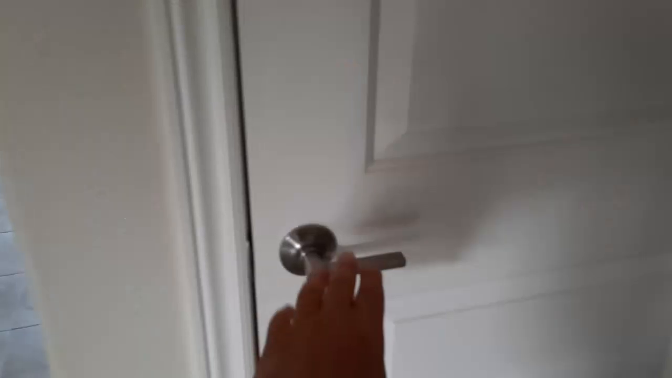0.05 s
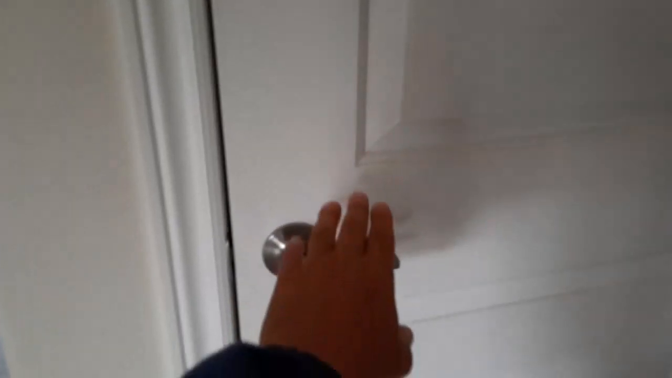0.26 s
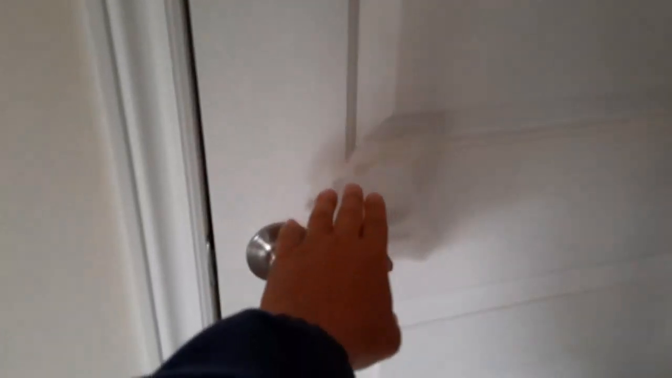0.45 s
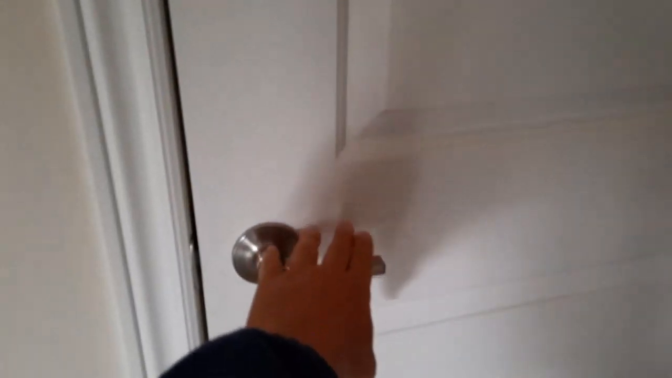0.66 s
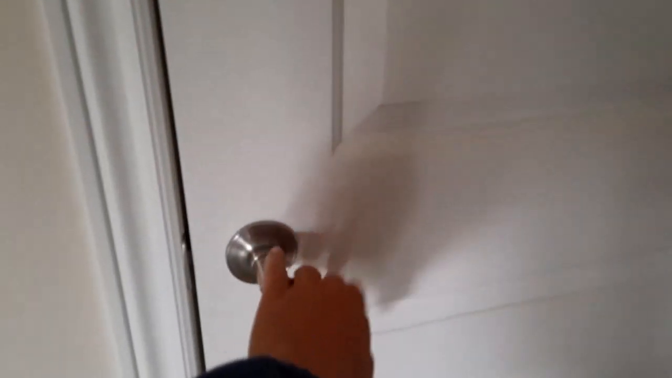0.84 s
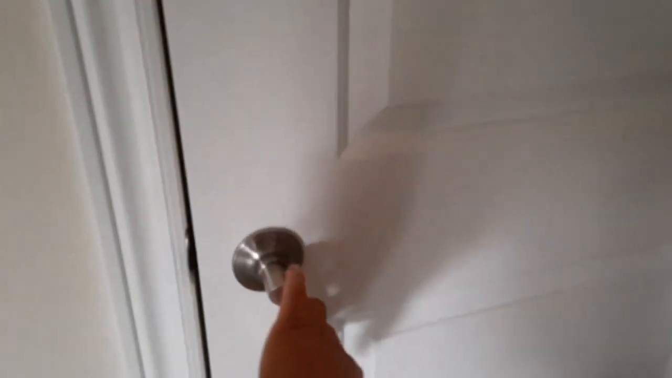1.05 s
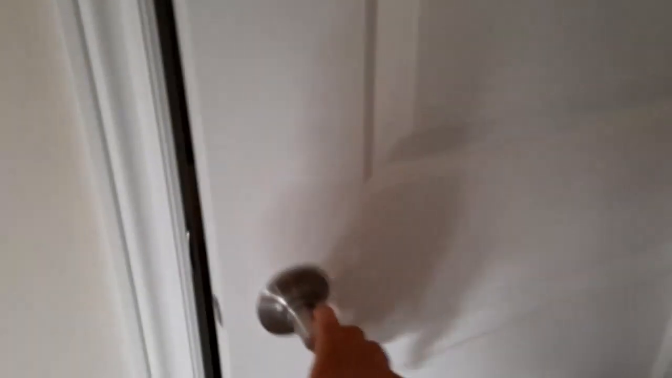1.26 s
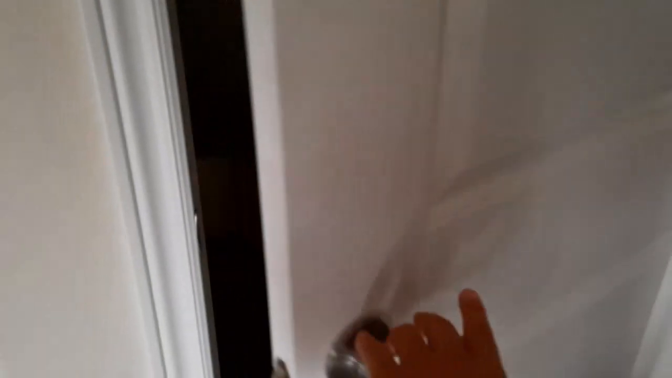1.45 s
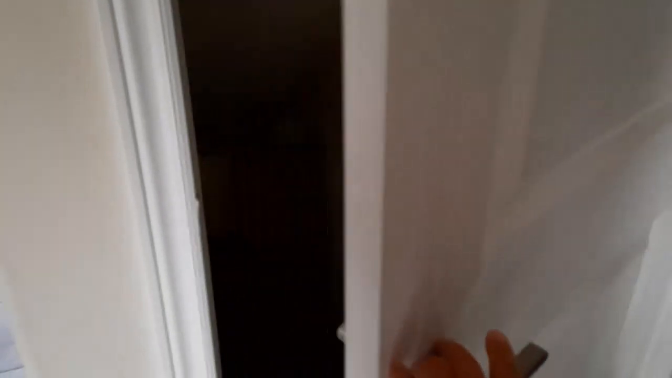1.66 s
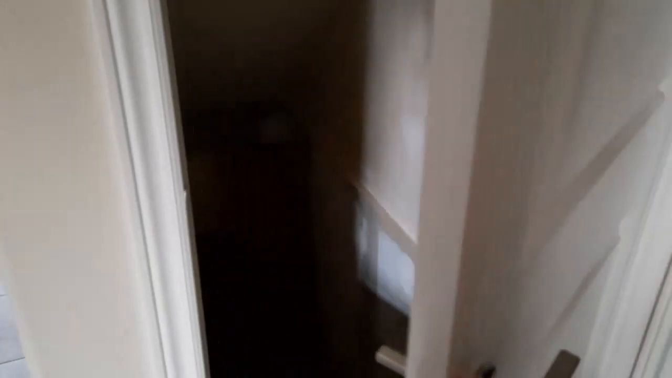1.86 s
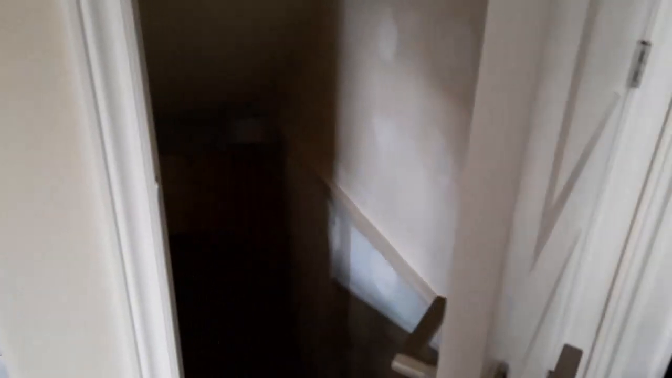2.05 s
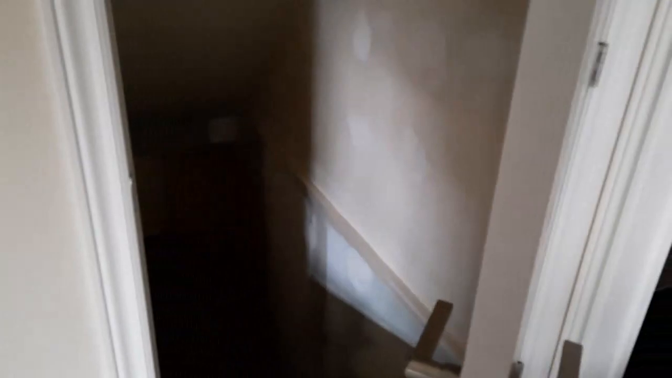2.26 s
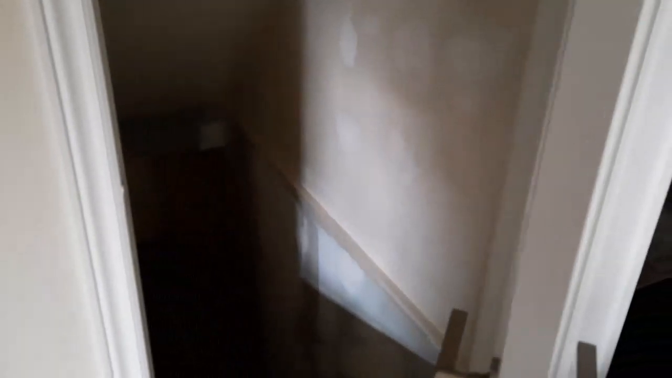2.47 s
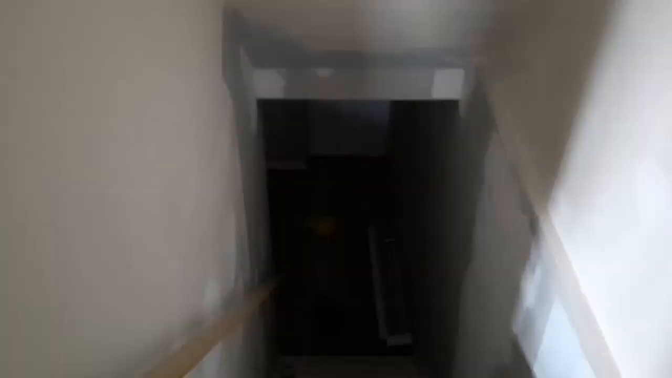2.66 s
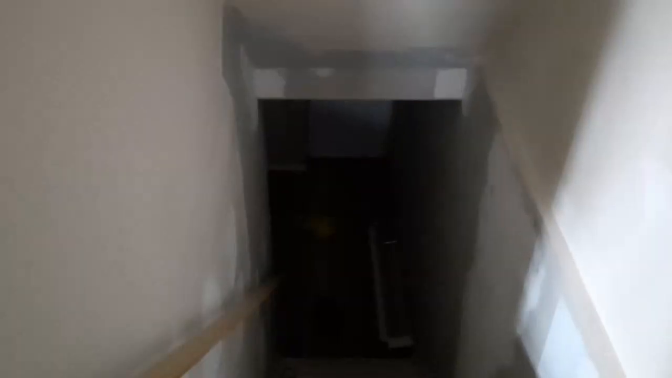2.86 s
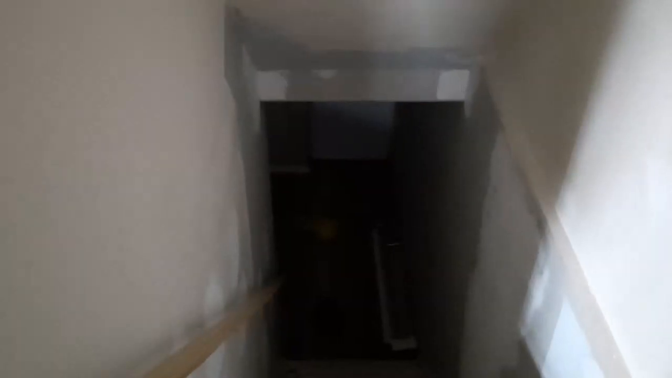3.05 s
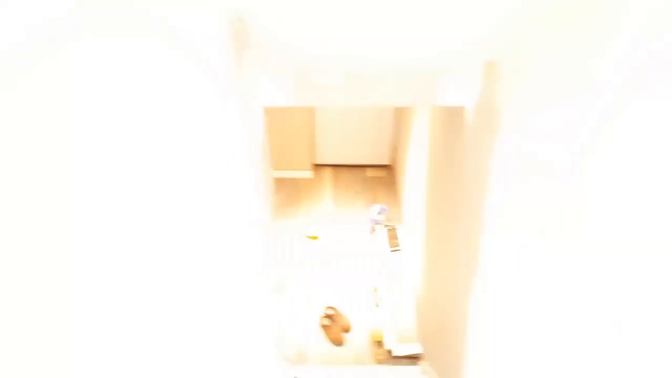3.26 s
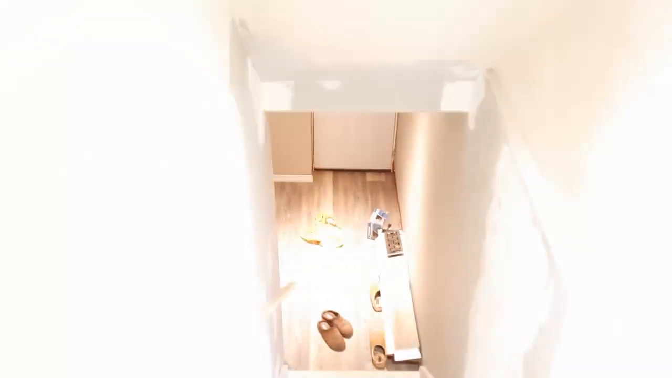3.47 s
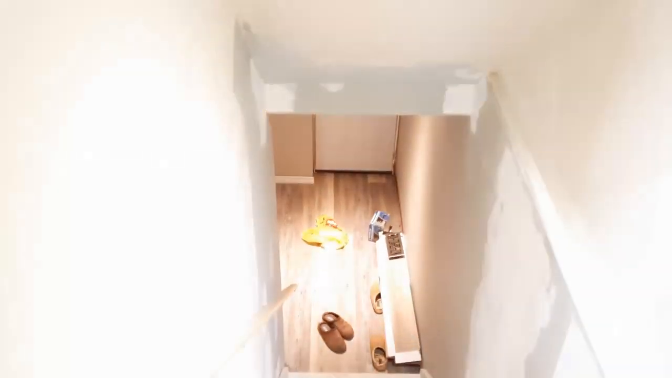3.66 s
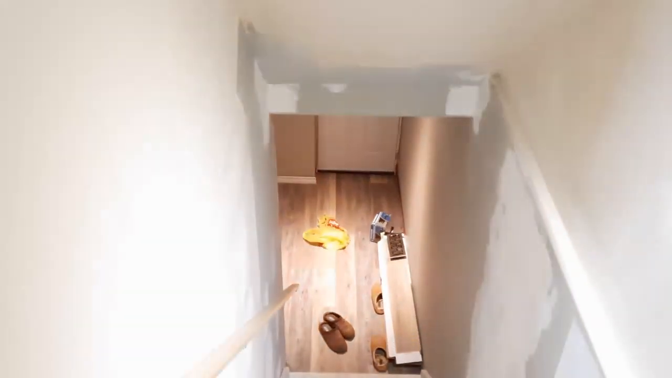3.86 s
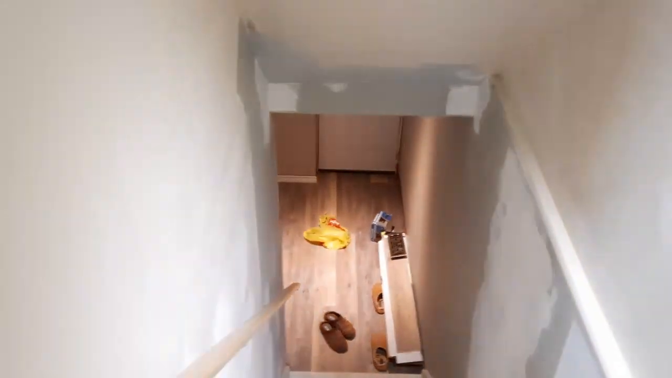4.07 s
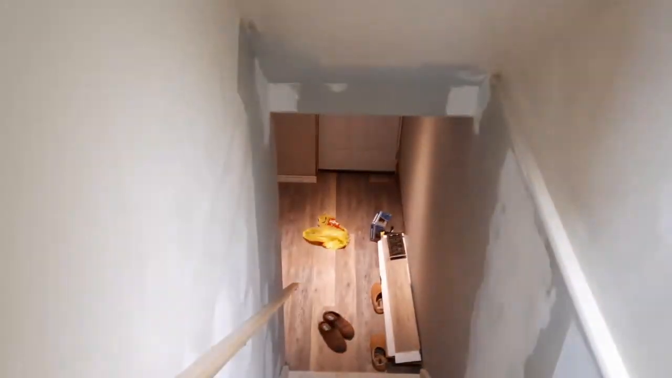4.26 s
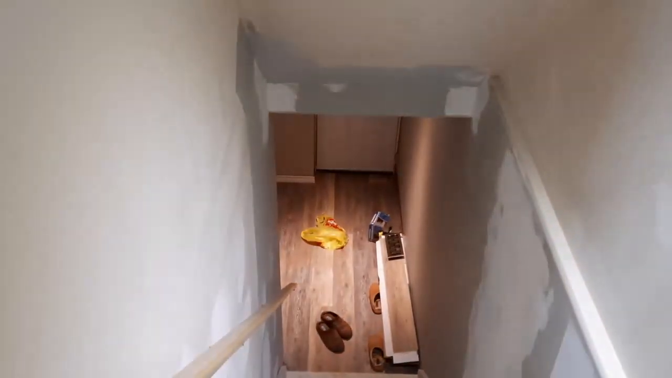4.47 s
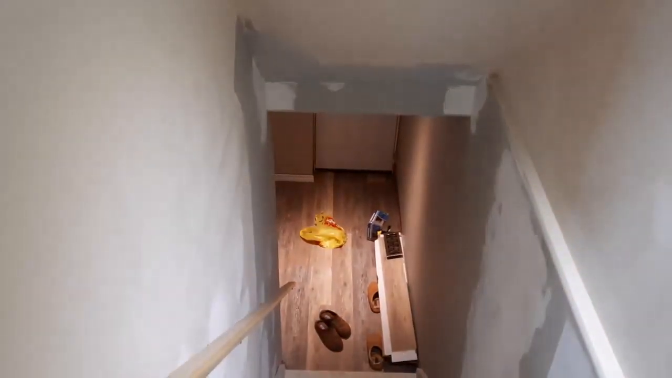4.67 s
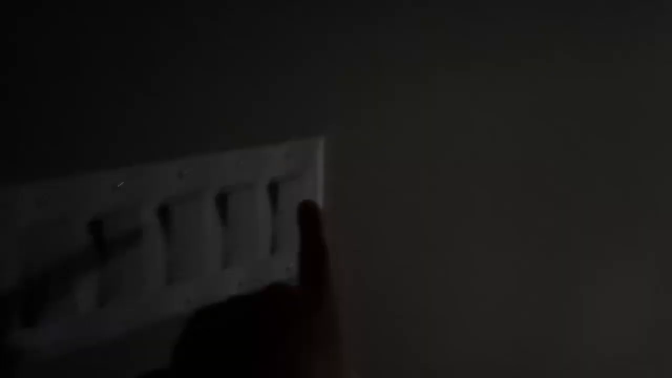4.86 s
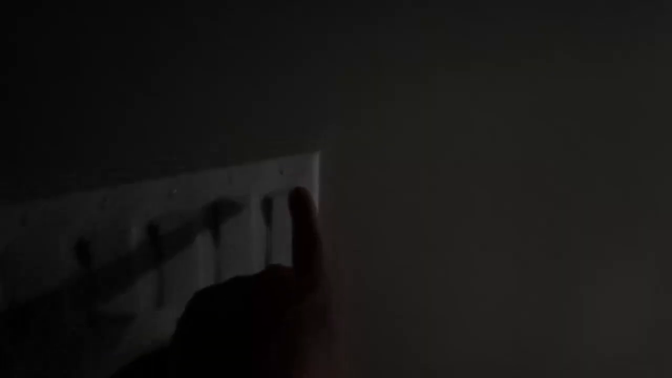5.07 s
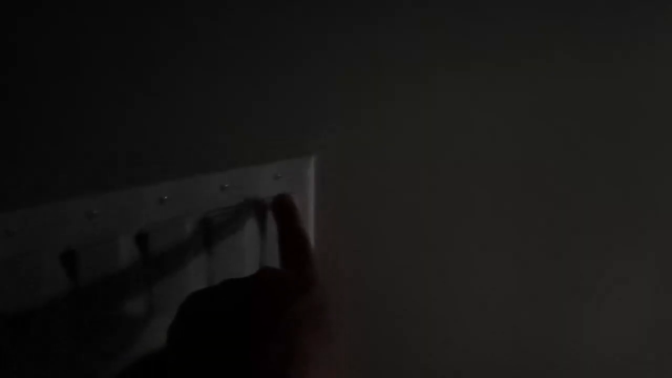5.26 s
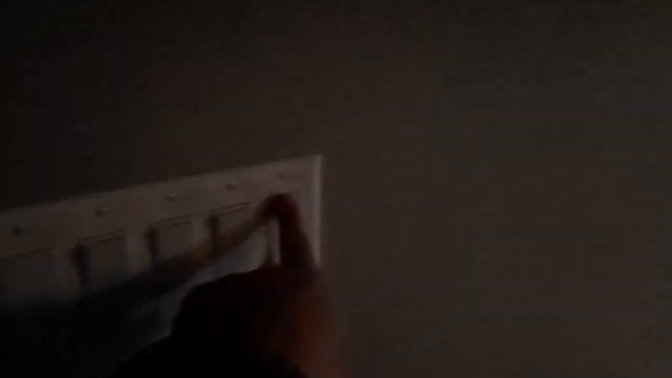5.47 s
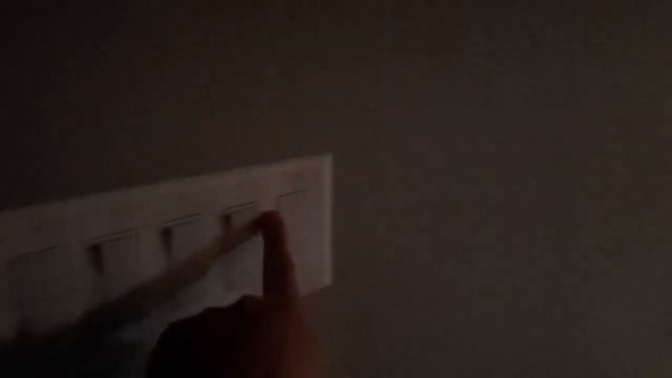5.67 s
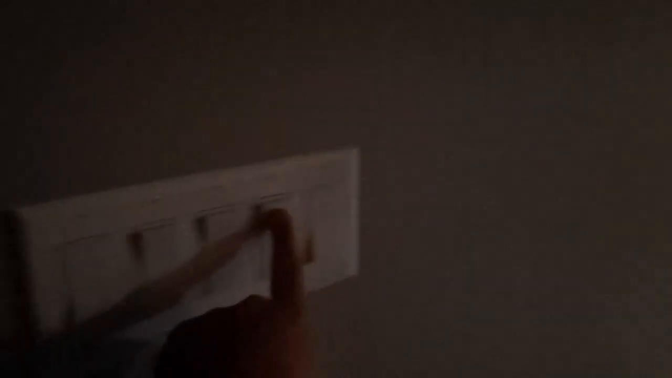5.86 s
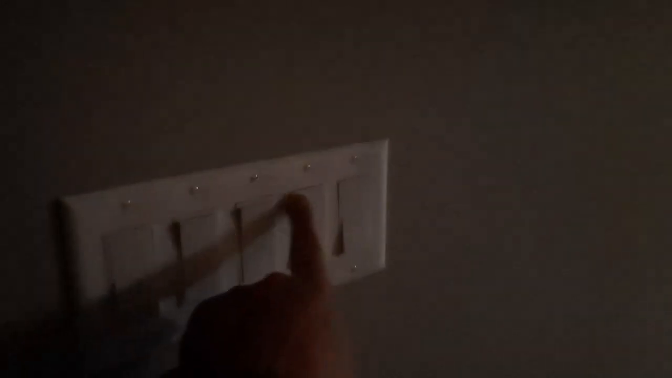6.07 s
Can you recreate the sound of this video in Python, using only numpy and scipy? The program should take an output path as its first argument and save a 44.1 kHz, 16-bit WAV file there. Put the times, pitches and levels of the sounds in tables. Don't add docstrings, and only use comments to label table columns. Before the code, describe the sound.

A door lever clatters and squeaks, snaps back with a hollow wooden knock, then one echoing switch click in a stairwell and two crisp switch snaps.

```python
import sys
import numpy as np
from scipy import signal
from scipy.fft import rfft, irfft, next_fast_len
from scipy.io import wavfile
from scipy.ndimage import uniform_filter1d

SR = 44100
rng = np.random.default_rng(int(sys.argv[2]) if len(sys.argv) > 2 else 0)


def rack_gain(trim_db):
    fader = np.asarray(trim_db, float)
    return 10 ** (fader / 20)


def persist_wave(psi):
    counts = np.round(np.clip(psi, -1, 1) * 32767).astype(np.int16)
    wavfile.write(sys.argv[1], SR, np.atleast_2d(counts).T)


N = 269892
DOOR_S = 2.6
BURST = 1500

# [t/s, peak level/dB, blow on the door/dB, brightness/dB per octave, left-right/dB]
KNOCKS = [(.612, -46.5, -32, 8, 3.5), (.798, -51, 12, 3, 0), (.866, -39.5, -20.5, 3.5, -6),
          (0.875, -27, -22.5, 1.5, -1.5), (0.8993, -18.5, -19.5, 4.5, -6.5), (.9054, -18, -9, -0.5, -3),
          (0.9186, -20, -26.5, 2.5, 0), (0.9382, -16, -18, 2, -6), (.9604, -29.5, -21.5, 3.5, 0.5),
          (1.0095, -22, -23, 0, -0.5), (1.128, -24, -7.5, 0.5, -0.5), (1.321, -35, -17, 4.5, -4.5),
          (1.3558, -28, -20.5, 2, 3.5), (1.3952, -10.5, -21, 3.5, 1), (1.428, -4, -18.5, 0, -2.5),
          (1.477, -15, -4.5, 1.5, 0.5), (1.482, -26.5, 13.5, -3.5, 0.5), (1.5579, -21.5, 2.5, -3, -2),
          (1.6182, -24, 5, -2.5, -1), (1.7167, -47.5, -33, 8, 2)]
# [f/Hz, level/dB per Hz]
LATCH_COLOUR = [(150, -29.5), (300, -1), (600, -1), (900, 1), (1500, -3.5), (2500, -7), (4000, -15),
                (6500, -17), (8500, -21), (12000, -20.5), (15500, -27), (17000, -45.5)]
# (t/s, level/dB, its modes [f/Hz, level/dB, t60/s])
BOLT = (1.1276, -22, [(1330, -1.5, .035), (1470, -1, .03), (1220, -4, .03)])
# [start t/s, rise/s, hold/s, effort level/dB, share of metal rubbing/dB]
STROKES = [
    (0.593, 0.033, 0.14, -63, 0),
    (.785, 0.0087, 0.045, -43.5, -11.5),
    (0.859, 0.05, 0.14, -27.5, -4.5),
    (1.124, 0.0069, 0.046, -31, -1.5),
    (1.194, 0.09, .04, -44, -10),
    (1.307, 0.046, .03, -34.5, -1.5),
    (1.37, 0.031, 0.08, -24.5, 0.5),
    (1.458, 0.016, .018, -16.5, -11),
    (1.546, 0.0093, .03, -28, -6),
    (1.592, 0.0081, .02, -32, -7.5),
]
# [start t/s, rise/s, hold/s, level/dB]
SWAYS = [
    (.6, .025, 0.24, -53),
    (0.875, .025, .12, -31.5),
    (1.112, .015, .04, -33.5),
    (1.394, .04, .09, -40),
]
# [f/Hz, level/dB]
HALL_COLOUR = [(1000, -3), (4000, -3), (12000, -5.5)]


def lever():
    size = round(DOOR_S * SR)
    t = seconds(size)
    cracks, blows = np.zeros((2, size)), np.zeros((1, size))
    for s, db, weight_db, tilt_db, pan_db in KNOCKS:
        metal = rack_gain(db + 7.0) * crack(LATCH_COLOUR, tilt_db, t60=0.0084)
        add(cracks, s + .001, panned(metal, pan_db))
        add(blows, s + 0.0014, rack_gain(db + weight_db) * np.ones((1, 1)))

    s, db, modes = BOLT
    u = t[:BURST * 2]
    bolt = sum(rack_gain(db + d - 60 * u / t60) * np.sin(2 * np.pi * hz * u) for hz, d, t60 in modes)
    add(cracks, s + 0.00078, bolt[None])

    effort_db, rub_db = np.transpose(STROKES)[-2:]
    shake_db = strokes(t, STROKES, effort_db, sag_db=12, fall_db=240)
    jolts = rng.standard_normal((2, size)) * (rng.random(size) < 1500 / SR)
    shake = rack_gain(shake_db + 1.5) * evened(ring(jolts))

    sway_db = strokes(t, SWAYS, np.transpose(SWAYS)[-1], sag_db=8, fall_db=150)
    sway = rack_gain(sway_db) * evened(band(rng.standard_normal((2, size)), 88, 100))

    rattle_db = strokes(t, STROKES, effort_db + rub_db, sag_db=78.5, fall_db=261.5)
    after_db = np.minimum(rattle_db, np.interp(t - .008, t, rattle_db))
    heavy_db = 1.8 * np.minimum(rng.exponential(1, size), 4)
    grains = rng.standard_normal((2, size)) * rack_gain(heavy_db) * (rng.random(size) < 4000 / SR)
    dull = click(LATCH_COLOUR, -2.5)
    rattle = rack_gain(after_db - 0.2) * evened(signal.oaconvolve(grains, dull[None], axes=1)[:, :size])

    near = cracks + ring(blows)
    spring = squeak()
    to_walls = rack_gain(5.5) * shaped(near, HALL_COLOUR) + rack_gain(-13) * spring
    hall = signal.fftconvolve(to_walls, echo(0.0043, 0.71), axes=1)[:, :size]
    return np.pad(near + spring + hall + shake + sway + rattle, ((0, 0), (0, N - size)))


def strokes(t, rows, tops_db, sag_db, fall_db):
    start, rise, hold = np.transpose(rows)[:3, :, None]
    u = t - start
    rise_db = -24 * np.clip(1 - u / rise, 0, 1)
    held_db = sag_db * np.clip(u - rise, 0, hold)
    released_db = fall_db * np.maximum(u - rise - hold, 0)
    db = tops_db[:, None] + rise_db - held_db - released_db
    return 10 * np.log10((rack_gain(db) ** 2 * (u > 0)).sum(0) + 1e-12)


# [f/Hz, level/dB, t60/s]
PANEL = [(86.2, -17, .2), (165, -14.5, 0.11), (317, 2.5, .08), (401.7, 5.5, 0.098), (516, -2, 0.051),
         (630, -10, 0.024), (785, -4, 0.015), (1160, -13, .025)]
FREE_S, FREE_HZ = 1.3, 394
HELD_DB, FREE_DB = -5, 0


def ring(drive):
    t, size = seconds(11000), drive.shape[1]
    modes = np.array([rack_gain(db - 60 * t / t60) * np.sin(2 * np.pi * hz * t) for hz, db, t60 in PANEL])
    whole = modes.sum(0)
    held = modes[np.argmin(abs(np.transpose(PANEL)[0] - FREE_HZ))]
    bodies = np.array([whole - held, held]) / abs(whole).max()
    bodies = signal.lfilter([1, -1], [1, -.99], bodies)
    damping = rack_gain(np.where(seconds(size) < FREE_S, HELD_DB, FREE_DB))
    drives = drive, drive * damping
    return sum(signal.oaconvolve(d, b[None], axes=1)[:, :size] for d, b in zip(drives, bodies))


# [t/s, slip rate f/Hz, level/dB]
SQUEAK = [
    (1.14, 1330, -51.5),
    (1.17, 1440, -48.5),
    (1.195, 1530, -47.5),
    (1.225, 1650, -40.5),
    (1.255, 1730, -41),
    (1.288, 1800, -39),
    (1.298, 1815, -50),
    (1.315, 1840, -61),
]
SQUEAK_ORDERS_DB = [5.5, 0.5, -8.5, -1.5, -8.5, -13, -12, -19, -19.5]


def squeak():
    s, *columns = np.transpose(SQUEAK)
    t = seconds(round(DOOR_S * SR))
    hz, db = [np.interp(t, s, c, -120, -120) for c in columns]
    waver, *flutters = uniform_filter1d(rng.standard_normal((10, len(hz))), size=260, axis=1)
    turns = np.cumsum(np.maximum(hz, 0) * (1 + 0.0041 * evened(waver))) / SR
    turns = turns + np.array([[.04], [0]])
    dulling_db = 1.3 * np.minimum(db + 42, 0)
    stack = 0
    for k, (order_db, flutter) in enumerate(zip(SQUEAK_ORDERS_DB, flutters), start=1):
        partial_db = order_db + 3.8 * evened(flutter) + (k > 1) * dulling_db
        stack = stack + rack_gain(partial_db) * np.cos(2 * np.pi * (k * turns + k * 0 + rng.random()))
    return panned(rack_gain(db + 2.5) * evened(stack), -4.5)


# [t/s, peak level/dB, left-right/dB, chatter t60/s]
SNAPS = [
    (3.0995, -3.5, -3, 0.0077),
    (5.4263, -8, -5, 0.049),
    (5.9875, -2.5, -3.5, 0.026),
]
# [echo level/dB, build-up/s, decay factor]
WALLS = [
    (11, .075, 0.83),
    (4.5, 0.0048, 0.96),
    (1.5, .0043, 1.2),
]
# [f/Hz, level/dB per Hz]
ROCKER_COLOURS = [
    [(25, -9.5), (110, -13), (200, -11), (320, -1), (430, -11), (660, -8.5), (1330, -21), (2200, -5.5),
     (3300, -20), (5200, -25.5), (7000, -20.5), (8600, -26.5), (12700, -21), (17000, -33)],
    [(35, -37), (100, -15), (220, -11), (295, 0), (400, -16.5), (750, -10.5), (1160, -12), (1800, -16),
     (2700, -17), (3800, -26), (5100, -33), (6150, -27), (11500, -42), (17000, -54)],
    [(35, -25), (119, -8.5), (181, -17), (326, 1.5), (480, -18), (1080, -8), (1500, -24), (2230, -8),
     (3200, -25), (4600, -22.5), (6300, -20), (8540, -35.5), (11900, -31), (17000, -40)],
]
# (start t/s, end t/s, level/dB, decay t60/s)
LATE_ECHO = (4.111, 4.162, -42, .45)
# [f/Hz, level/dB per Hz]
LATE_COLOUR = [(25, 11.5), (100, -17), (300, -4), (700, -21), (2000, -14.5), (3500, -25.5), (7000, -26.5),
               (11000, -15), (15000, -20), (17000, -30)]
PULSE, REBOUND = 2048, 330


def switches():
    out = np.zeros((2, N))
    for (s, db, pan_db, chatter_s), wall, colour in zip(SNAPS, WALLS, ROCKER_COLOURS):
        echo_db, build_s, stretch = wall
        snap = rack_gain(db) * crack(colour, 3.1, t60=chatter_s)
        snap[:, REBOUND:] += 0.28 * snap[:, :-REBOUND]
        add(out, s, panned(snap, pan_db))
        dull = evened(click(colour)) * np.linalg.norm(snap) / np.sqrt(2 * PULSE)
        add(out, s, rack_gain(echo_db) * signal.fftconvolve(dull[None], echo(build_s, stretch), axes=1))

    start, end, db, t60 = LATE_ECHO
    t = seconds(4096)
    late = panned(evened(shaped(rng.standard_normal((2, len(t))), LATE_COLOUR)), -14)
    add(out, start, late * rack_gain(db - 60 * t / t60) * np.clip((end - start - t) / .01, 0, 1))
    return out


def crack(points, tilt_db, t60):
    chatter = rng.standard_normal((2, BURST)) * rack_gain(-60 * seconds(BURST) / t60)
    sound = signal.fftconvolve(chatter, click(points, tilt_db)[None], axes=1)
    return sound / abs(sound).max()


def click(points, tilt_db=0.):
    hz = abs(np.fft.fftfreq(2 * PULSE, 1 / SR))
    gain = np.log(rack_gain(read(points, hz) + tilt_db * np.log2(hz / 2000 + 0.024)))
    pulse = np.fft.ifft(np.exp(gain - 1j * signal.hilbert(gain).imag)).real[:PULSE]
    return pulse / abs(pulse).max()


# [f/Hz, t60/s]
ROOM = [(60, 0.81), (160, 0.3), (420, 0.46), (1100, .42), (2000, 0.44), (3500, .41), (5200, 0.5),
        (6400, 0.45), (7800, 0.36), (16000, 0.37)]


def echo(build_s, stretch):
    size = SR // 4 * 3
    taps, slots = np.zeros((2, size)), np.arange(96, size - 12, 12)
    at = slots + rng.integers(0, 12, (2, len(slots)))
    np.put_along_axis(taps, at, rng.choice([-1., 1.], at.shape), 1)
    hz, t, z = signal.stft(taps, SR, nperseg=256)
    late = np.maximum(t - build_s, 0)
    decay = rack_gain(-60 * late / (stretch * read(ROOM, hz)[:, None]))
    tail = signal.istft(z * decay, SR, nperseg=256)[1][:, :size]
    return tail / np.linalg.norm(tail[0])


# [t/s, length/s, f/Hz, width f/Hz, level/dB]
CREAKS = [(.001, 0.0072, 298, 400, -52), (0.488, .1, 1530, 248.4, -74.5), (1.738, 0.17, 800, 399.4, -65),
          (1.9, 0.13, 895.5, 191, -62.5), (1.91, 0.16, 2000, 200.2, -66), (2.525, 0.093, 2900, 298.9, -72),
          (2.66, .04, 2200, 700, -72.5), (2.74, 0.16, 1700, 621, -70.5), (3.097, .24, 45, 39.7, -48.5),
          (5.373, 0.049, 2400, 1603, -66), (5.62, 0.18, 1761, 277.8, -66.5), (5.69, 0.13, 32, 34, -52),
          (5.939, .04, 2400, 610, -65), (7.9, 0.016, 6300, 4400, -69.5)]


def creaks():
    out = np.zeros((2, N))
    for s, length, hz, width_hz, db in CREAKS:
        slips = rng.standard_normal((2, SR // 4)) ** 3
        sound = evened(band(slips, hz, width_hz))[:, :round(length * SR)]
        add(out, s, rack_gain(db) * sound * signal.windows.tukey(sound.shape[1], .5))
    return out


# [start t/s, air and rumble level/dB, hiss level/dB, middle level/dB, fresh hiss level/dB]
TAKES = [
    (0, -63.5, -87, -72, -63.5),
    (2.62, -64, -88, -74, -71),
    (4.11, -62, -85, -75, -75.5),
    (4.88, -62.5, -98, -75.5, -77),
]
# [middle t/s, length/s, hiss level/dB, dullness/dB]
BRUSHES = [(0.663, 0.14, -67, -8), (2.31, 1, -72.5, -26), (2.529, 0.097, -62, -6.5), (2.77, .2, -66, -3.5),
           (3.551, 0.51, -71.5, -14), (3.901, 0.67, -73, -19), (4.21, 0.29, -66, 5.5),
           (4.35, 0.15, -62, -6.5), (4.616, 0.053, -74.5, 2), (4.713, 0.15, -65.5, -4),
           (4.804, 0.13, -69.5, -1), (4.945, 0.22, -71.5, -9), (5.5, .2, -52.5, -18),
           (5.665, 0.42, -69, -6)]
# [f/Hz, level/dB per Hz]
RUMBLE = [(15, -28.5), (30, -8), (60, 1), (130, -0.5), (230, -6.5), (330, -3.5), (560, -13), (800, -18),
          (1400, -32), (5000, -71)]
# [f/Hz, level/dB per Hz]
MIDDLE = [(500, -18.5), (900, -0.5), (2000, -4.5), (4000, -10), (6000, -17), (12000, -61.5)]
# [f/Hz, level/dB per Hz]
HISS = [(3000, -23.5), (5000, -8.5), (7000, -2), (9500, -2.5), (12000, -0.5), (15000, -4.5), (15700, -6),
        (16000, -42.5)]
# [t/s, left-right/dB]
LEAN = [(4.1, 0.5), (4.11, -14), (4.4, -2.5), (4.6, -1.5), (5, 1.5)]
# [t/s, level/dB]
HUM = [(0, -67), (2, -69.5), (3.3, -66), (4.3, -65), (4.85, -60.5), (4.9, -94.5), (6.2, -86)]


def house():
    t = seconds()
    takes = np.transpose(TAKES)
    start, air_db, hiss_db, middle_db, fresh_db = takes[:, np.searchsorted(takes[0], t, "right") - 1]
    air, middle = rack_gain(air_db) ** 2, rack_gain(middle_db) ** 2
    hiss = rack_gain(hiss_db) ** 2 + rack_gain(fresh_db - 6.5 * (t - start)) ** 2
    for s, length, db, dull_db in BRUSHES:
        swell = np.cos(np.pi * np.clip((t - s) / length, -.5, .5)) ** 4
        hiss = hiss + swell * rack_gain(db) ** 2
        middle = middle + swell * rack_gain(db + dull_db) ** 2
        air = air + swell * rack_gain(db + dull_db + 2) ** 2
    out = np.zeros((2, N))
    for power, colour in zip((air, hiss, middle), (RUMBLE, HISS, MIDDLE)):
        out += np.sqrt(power) * evened(shaped(rng.standard_normal((2, N)), colour))
    lean_db = np.interp(t, *np.transpose(LEAN))

    waver = evened(uniform_filter1d(rng.standard_normal(N), size=2500))
    hum = np.sqrt(2) * np.sin(2 * np.pi * 178 * t + 0.13 * waver)
    hum_db = np.interp(t, *np.transpose(HUM)) + 1.2 * waver
    return out * rack_gain([lean_db / 2, -lean_db / 2]) + rack_gain(hum_db) * hum


def seconds(size=N):
    return np.arange(size) / SR


def evened(x):
    return x / np.sqrt(np.mean(x ** 2) + 1e-20)


def read(points, hz):
    f, value = np.transpose(points)
    return np.interp(np.log(hz + 1), np.log(f + 1), value)


def shaped(x, points):
    length = x.shape[-1]
    size = next_fast_len(length)
    gain = rack_gain(read(points, np.fft.rfftfreq(size, 1 / SR)))
    return irfft(rfft(x, size) * gain, size)[..., :length]


def band(x, hz, width_hz):
    edges = [hz - width_hz / 2, hz + width_hz / 2]
    return signal.sosfilt(signal.butter(2, edges, "band", fs=SR, output="sos"), x)


def panned(x, pan_db):
    return x * rack_gain([[pan_db / 2], [-pan_db / 2]])


def add(mix, s, sound):
    part = mix[:, round(s * SR):][:, :sound.shape[-1]]
    part += sound[..., :part.shape[1]]


def scene():
    return lever() + switches() + creaks() + house()


def band_limit(x):
    return signal.sosfilt(signal.butter(12, 17140, fs=SR, output="sos"), x)


# [f/Hz, side level/dB]
WIDTH = [(60, -14), (250, -16), (500, -8), (1000, -1), (16000, 0)]
# [f/Hz, level/dB]
MICROPHONE = [(20, -14), (70, 0), (15600, 0), (16300, -12), (17200, -50)]
# [start t/s, end t/s]
SILENCES = [
    (.008, .064),
    (2.590, 2.653),
    (2.697, 2.731),
    (4.746, 4.783),
    (4.851, 4.905),
]


def record(dry):
    mid, side = (dry[0] + dry[1]) / 2, shaped((dry[0] - dry[1]) / 2, WIDTH)
    mid, side = .92 * np.tanh(shaped(np.array([mid, side]), MICROPHONE) / .92)
    open_, t = np.ones(N), seconds()
    for start, end in SILENCES:
        open_ *= np.clip(np.maximum(start - t, t - end) / .005, .012, 1)
    return band_limit(np.array([mid + side, mid - side]) * open_)


dry = scene()
out = record(dry)
persist_wave(out)
```